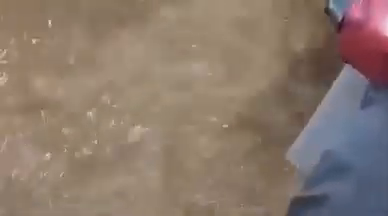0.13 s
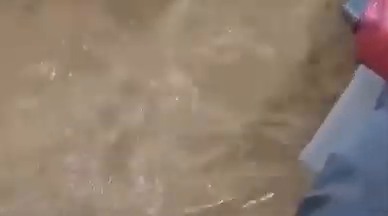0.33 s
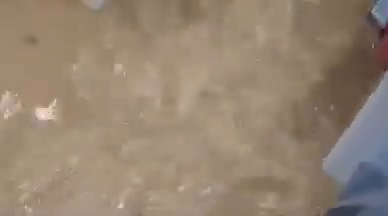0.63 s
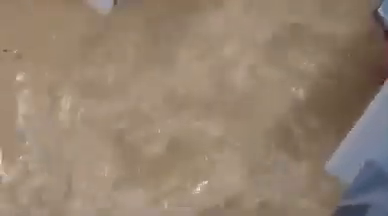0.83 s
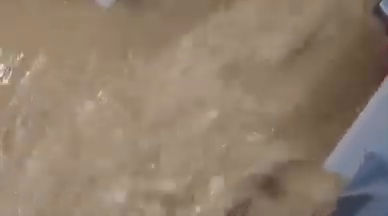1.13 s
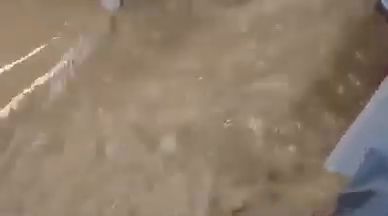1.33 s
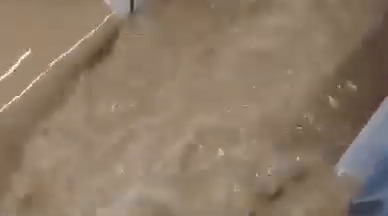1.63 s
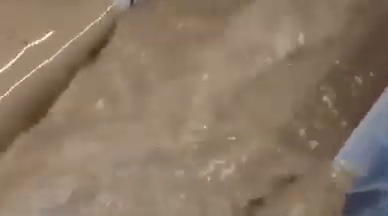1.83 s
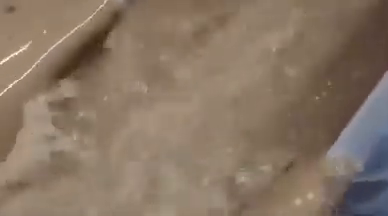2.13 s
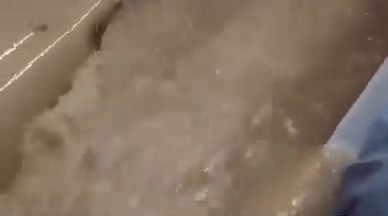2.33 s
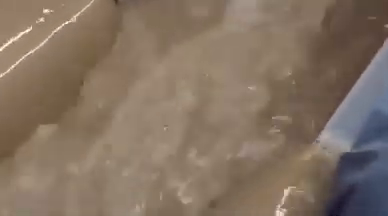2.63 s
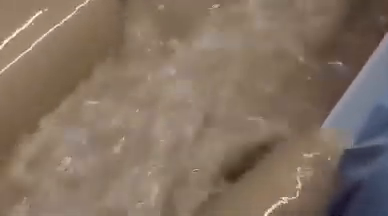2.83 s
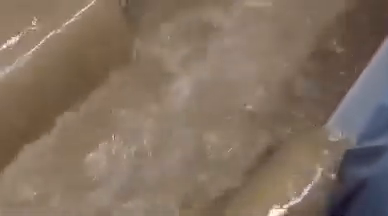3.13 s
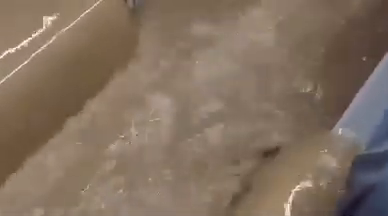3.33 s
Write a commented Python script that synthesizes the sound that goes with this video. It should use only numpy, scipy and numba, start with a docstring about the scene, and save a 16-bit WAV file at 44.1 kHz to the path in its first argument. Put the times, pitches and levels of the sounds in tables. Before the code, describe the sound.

Floodwater rushes and churns steadily beside a wading vehicle, heard close from on board. Underneath, the engine rumbles and booms, slowing a little under load, while small spits of spray and sloshes break through the hiss.

```python
"""On board a vehicle wading through muddy floodwater. The engine slows under the load, its firings
booming through the rumbling body, while a belt-driven part hums. The bow wave churns alongside:
countless ringing bubbles under a hiss of spray, with a few spits, sloshes and single bubble pings.
Two low buffets come and go, and later two faint, thin whistles sound through the water."""
import sys
import numpy as np
from scipy import signal
from scipy.fft import rfft, irfft
from scipy.io import wavfile
from scipy.ndimage import map_coordinates
from numba import njit

SR = 44100
rng = np.random.default_rng(int(sys.argv[2]) if len(sys.argv) > 2 else 0)


def int16_out(signal):
    """Quantize to a 16-bit WAV file."""
    q = np.round(np.clip(np.atleast_2d(signal).T, -1, 1) * 32767)
    wavfile.write(sys.argv[1], SR, q.astype(np.int16))


N = 153468
TIME = np.arange(N) / SR
FREQS = np.fft.rfftfreq(N, 1 / SR)


def undb(db):
    """Turn decibels into a gain."""
    return 10 ** (np.asarray(db) / 20)


def unit(x):
    """Scale a signal to an average (rms) strength of 1."""
    return x / np.sqrt(np.mean(x ** 2) + 1e-20)


def bell(x, width):
    """A smooth hump around zero."""
    return np.exp(-(x / width) ** 2 / 2)


def curve(table, column=1):
    """One column of a table, joined by straight lines in time."""
    rows = np.array(table, float)
    return np.interp(TIME, rows[:, 0], rows[:, column])


def response(spectrum, hz):
    """Look up the gain at these frequencies in rows of Hz and dB."""
    rows = np.array(spectrum, float)
    return undb(np.interp(np.log(hz + 1e-9), np.log(rows[:, 0]), rows[:, 1]))


def colour(x, spectrum):
    """Filter a sound by rows of Hz and dB, then scale it to strength 1."""
    return unit(irfft(rfft(x) * response(spectrum, FREQS), N))


def wander(rate_hz):
    """A smooth random drift of typical size 1."""
    slow_only = np.exp(-(FREQS / rate_hz) ** 2) * (FREQS > 0)
    return unit(irfft(rfft(rng.standard_normal(N)) * slow_only, N))


def tone(hz, wobble):
    """A pure tone whose pitch wavers."""
    wavering_hz = hz * (1 + wobble * wander(39.8))
    return np.sin(2 * np.pi * np.cumsum(wavering_hz) / SR)


# How fast the engine turns. Each row: time in seconds, turns per second.
CRANK_SPEED = [(0, 33.5), (.3, 32.4), (.7, 31.3), (1.1, 30.3), (1.55, 29.7), (1.75, 28.8), (2.1, 28.8),
               (2.35, 28.35), (2.9, 28.45), (3.48, 29.2)]

def crankshaft():
    """The shaft slows under load. Gives its turns per second and its angle in radians."""
    speed = curve(CRANK_SPEED) * (1 + .004 * wander(10))
    return speed, 2 * np.pi * np.cumsum(speed) / SR


# An "order" is a tone at a whole multiple of the shaft's speed. These are the main ones.
MAIN_ORDERS = (2, 3, 4, 5, 8)
# Their loudness. Each row: time in seconds, then a level in dB for each main order.
MAIN_LEVELS = [(0, -16.5, -26, -19, -37, -39), (.25, -22.5, -27, -21.5, -43, -31.5),
               (.55, -20.5, -25, -22.5, -32, -40), (.8, -19, -28, -23, -29.5, -39),
               (1.05, -16.5, -27.5, -29.5, -35, -31.5), (1.35, -18, -23, -23, -27.5, -31.5),
               (1.6, -29, -25, -25, -24, -30), (1.85, -13, -24, -24.5, -26, -41.5),
               (2.08, -19.5, -26, -24, -25, -41), (2.23, -12, -27, -29.5, -26.5, -38.5),
               (2.45, -14.5, -26, -37, -26.5, -52), (2.85, -13.5, -24.5, -43, -27.5, -43),
               (3.48, -17.5, -26.5, -32, -26, -35.5)]
# How well the body carries the other orders. Each row: frequency in Hz, gain in dB.
BODY_RESPONSE = [(165, -36.5), (195, -34.5), (215, -45), (300, -48), (348, -41.5), (400, -52), (520, -48.5)]
# The chugging, roughest while the engine labours. Each row: time in seconds, level swing in dB.
CHUG_DEPTH = [(0, 2.0), (2.1, 1.3), (2.35, .6), (3.48, .9)]

def engine(speed, angle):
    """Two firings a turn boom through the body; unequal cylinders add the odd orders."""
    depth = curve(CHUG_DEPTH)
    chug = undb(depth * unit(np.gradient(wander(13))))
    stumble = .025 * depth * unit(np.gradient(wander(18)))  # firings come early or late
    out = np.zeros(N)
    for order in range(2, 17):
        if order in MAIN_ORDERS:
            gain = undb(curve(MAIN_LEVELS, MAIN_ORDERS.index(order) + 1) + wander(30))
        else:  # the others grow stronger under load
            waver_db = 3.5 * (wander(3.5) - 1)
            gain = response(BODY_RESPONSE, order * speed) * np.sqrt(depth) * undb(waver_db)
        wobble = .07 * (order - 1) * wander(8.4)  # higher orders are more ragged
        smear = order ** 2  # the body spreads each firing in time
        out += np.sqrt(2) * gain * chug * np.sin(order * (angle + stumble) + wobble + smear)
    return out


# How loud the hum is. Each row: time in seconds, level in dB.
BELT_LEVEL = [(0, -55.5), (1.2, -38.5), (1.5, -44.5), (1.85, -32.5), (2.1, -44.5), (3.48, -37)]

def belt_hum(angle):
    """A belt-driven part hums at 9.26 times the shaft's speed, its level wavering."""
    level_db = curve(BELT_LEVEL) + 2.5 * wander(7.3)
    return np.sqrt(2) * undb(level_db) * np.sin(9.26 * angle)


# The tone of the rumble. Each row: frequency in Hz, relative level in dB.
RUMBLE_SPECTRUM = [(15, -22.5), (26, -0.5), (45, -2), (70, -1), (145, -2.5), (180, -11), (250, -14.5),
                   (350, -16), (500, -39), (900, -53.5)]
# How loud it is. Each row: time in seconds, level in dB.
RUMBLE_LEVEL = [(0, -22.5), (.45, -24.5), (.7, -22), (1.1, -25), (1.6, -24.5), (2.15, -20), (2.4, -26),
                (3.0, -28.5), (3.48, -23)]

def body_rumble(angle):
    """The body shakes, throbbing with the two firings of each turn."""
    throb = 1 + .4 * np.cos(2 * angle)
    shaking = rng.standard_normal(N) * throb
    return colour(shaking, RUMBLE_SPECTRUM) * undb(curve(RUMBLE_LEVEL))


@njit
def ring_bubbles(starts, hz, cycles, strength):
    """Each bubble is a dying tone that glides up 2.6% over its given number of cycles."""
    out = np.zeros(N)
    for k in range(len(starts)):
        decay_samples = cycles[k] * SR / hz[k] / 3
        first = int(starts[k])
        spin = 2j * np.pi * hz[k] / SR
        wave = strength[k] + 0j
        step = np.exp(spin - 1 / decay_samples)  # turns and shrinks the wave each sample
        glide = np.exp(spin * .026 / (3 * decay_samples))
        for i in range(first, min(N, first + int(6 * decay_samples))):
            wave *= step
            step *= glide
            out[i] += wave.imag
    return out


def foam(per_second, low_hz, high_hz, cycles, spread_db=-.5, share=.17):
    """Ringing bubbles carry `share` of the power; the rest is the hiss of those too small to tell apart."""
    when, pitch, length, chance = rng.random((int(per_second * N / SR), 4)).T
    hz = low_hz * (high_hz / low_hz) ** pitch
    strength = undb(-spread_db * np.log(chance + .031)) * hz / high_hz
    bubbles = unit(ring_bubbles(when * N, hz, cycles * (.5 + length), strength))
    return np.sqrt(share) * bubbles + np.sqrt(1 - share) * rng.standard_normal(N)


# The tone of the churning water and of the spray. Each row: frequency in Hz, relative level in dB.
CHURN_SPECTRUM = [(200, 1.5), (350, 2), (520, -2), (760, 0.56), (970, -2.5), (1250, -1.5), (1530, 1.5),
                  (1900, -6.5), (2300, -12.5), (3000, -27), (5000, -39.5)]
SPRAY_SPECTRUM = [(1200, -4), (2200, 1.5), (2800, 0), (4500, -0.4), (5300, -3.5), (7600, -4.5), (8600, -10)]
# How strong the wave is. Each row: time in seconds, churn level in dB, spray level in dB.
WAVE_LEVELS = [(0, -28.5, -32.5), (.52, -29, -32.5), (.65, -27.5, -30), (1.05, -27, -30), (1.5, -25.5, -30),
               (1.78, -25.5, -31), (1.9, -22, -29), (2.04, -28, -31.5), (2.25, -27, -30.5),
               (2.42, -28, -34), (2.75, -29.5, -34.5), (2.9, -26.5, -33.5), (3.1, -31, -35),
               (3.48, -29.5, -35)]

def bow_wave():
    """Bubbles churn, their pitch drifting with their size; droplets fizz above and surge with them."""
    surge = wander(14)
    bubbles = foam(per_second=3500, low_hz=283.94, high_hz=3153, cycles=43.5, spread_db=1.5, share=.51)
    churn = colour(bubbles, CHURN_SPECTRUM)
    position = np.cumsum(1 + .02 * wander(8))  # reading faster or slower bends the pitch
    churn = map_coordinates(churn, [position], mode="mirror")
    droplets = foam(per_second=9000, low_hz=1725, high_hz=9630, cycles=8.7)
    spray = colour(droplets, SPRAY_SPECTRUM)
    churn_db = curve(WAVE_LEVELS, 1) + .7 * surge
    spray_db = curve(WAVE_LEVELS, 2) + .55 * surge
    return churn * undb(churn_db) + spray * undb(spray_db)


def band(water, hz, octaves):
    """Keep the part of the water's sound around one pitch, at strength 1."""
    octaves_away = np.log2(FREQS + 1) - np.log2(hz)
    return unit(irfft(rfft(water) * bell(octaves_away, octaves), N))


# Spits of spray. Each row: peak time in seconds, level in dB, centre pitch in Hz,
# width in octaves, decay in seconds.
SPITS = [(.126, -36, 7600, .25, 0.016), (.19, -33, 3450, .4, 0.04), (.237, -33, 4530, 0.092, .016),
         (.252, -32, 5500, 0.91, .03), (0.338, -27, 5400, 0.56, 0.027), (2.122, -29, 3300, 0.72, 0.032),
         (2.273, -26, 1000, .9, 0.017)]

def spits(water):
    """Small crests burst into spray that starts sharply and dies away."""
    out = np.zeros(N)
    for peak, db, hz, octaves, decay in SPITS:
        age = TIME - peak
        envelope = np.where(age < 0, bell(age, .0065), np.exp(-abs(age) / decay))
        out += undb(db) * envelope * band(water, hz, octaves)
    return out


# Low buffets. Each row: peak time in seconds, level in dB.
BUFFETS = [(.16, -20), (1.612, -18.5)]

def buffets(hz=33, swell_s=.03):
    """Brief, very low swells of pressure."""
    out = np.zeros(N)
    for peak, db in BUFFETS:
        age = TIME - peak
        out += np.sqrt(2) * undb(db) * bell(age, swell_s) * np.sin(2 * np.pi * hz * age)
    return out


# Sloshes of water. Each row: peak time in seconds, level in dB, centre pitch in Hz,
# width in octaves, swell in seconds.
SLOSHES = [(.2, -37, 744, 0.1, 0.11), (.385, -27, 1200, 0.55, 0.038), (.65, -33.5, 1600, 0.7, 0.032),
           (.97, -28, 1100, 0.73, 0.09), (1.905, -27.5, 264, 0.23, 0.031), (2.025, -27.5, 1410, .2, 0.012),
           (2.11, -31, 1400, 0.58, .02), (3.17, -30.5, 1360, .2, 0.012)]

def sloshes(water):
    """Large crests swell and sink back smoothly."""
    return sum(undb(db) * bell(TIME - peak, swell) * band(water, hz, octaves)
               for peak, db, hz, octaves, swell in SLOSHES)


# Single bubbles. Each row: peak time in seconds, level in dB, pitch in Hz, swell in seconds.
PINGS = [(.337, -28, 2360, .004), (.72, -36, 6300, 0.013), (1.938, -22.5, 1674, 0.011),
         (2.2, -25, 850, .012)]

def bubble_pings():
    """Single bubbles ring briefly above the wash, their pitch unsteady."""
    return sum(undb(db) * bell(TIME - peak, swell) * tone(hz, wobble=.005)
               for peak, db, hz, swell in PINGS)


# Thin whistles. Each row: start in seconds, length in seconds, pitch in Hz, level in dB.
WHISTLES = [(1.972, 0.35, 1075, -34.5), (3.01, 0.28, 1202, -35)]

def whistles(fade_s=.09):
    """Faint, almost steady tones that fade in and out."""
    out = np.zeros(N)
    for start, length, hz, db in WHISTLES:
        to_nearest_end = np.minimum(TIME - start, start + length - TIME)
        envelope = np.clip(to_nearest_end / fade_s, 0, 1)
        out += np.sqrt(2) * undb(db) * envelope * tone(hz, wobble=.006)
    return out


def scene():
    """Add the vehicle and the water together in one channel."""
    speed, angle = crankshaft()
    vehicle = belt_hum(angle) + engine(speed, angle) + body_rumble(angle) + buffets() + whistles()
    wave = bow_wave()
    water = foam(per_second=4000, low_hz=202, high_hz=8560, cycles=17)
    return (vehicle + wave + spits(water) + sloshes(water) + bubble_pings())[None]


def record(dry):
    """Cut the treble steeply above 8650 Hz."""
    return signal.sosfilt(signal.ellip(12, .2, 90, 8650, fs=SR, output="sos"), dry)


dry = scene()
out = record(dry)
int16_out(out)
```